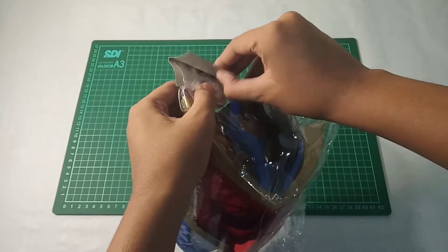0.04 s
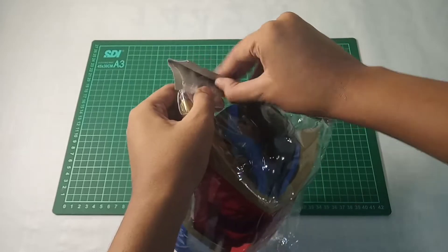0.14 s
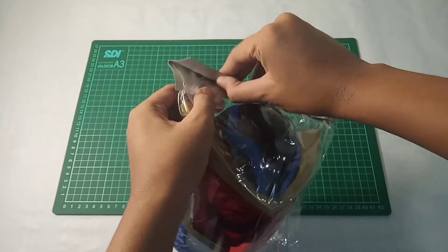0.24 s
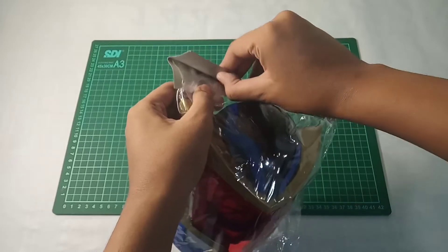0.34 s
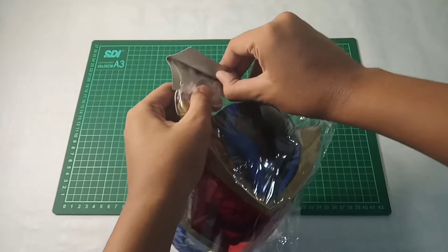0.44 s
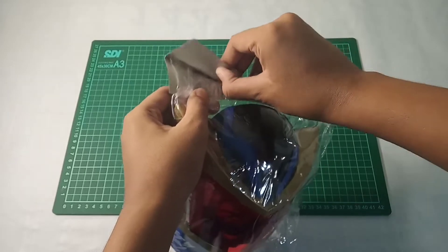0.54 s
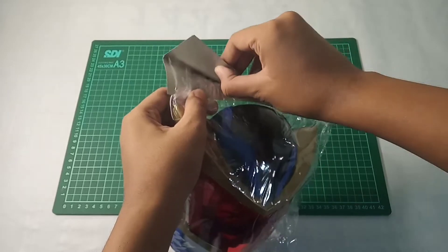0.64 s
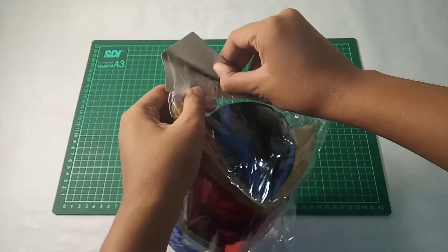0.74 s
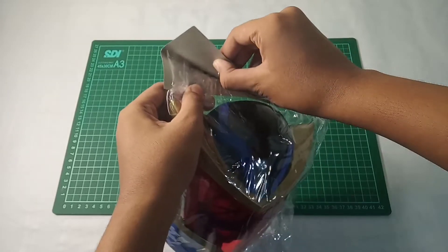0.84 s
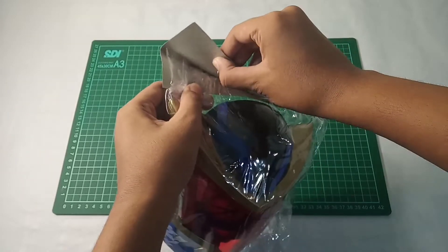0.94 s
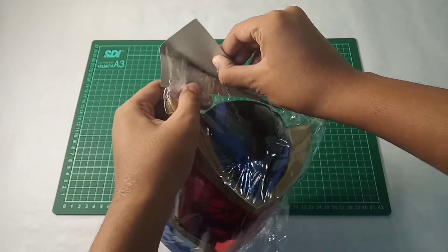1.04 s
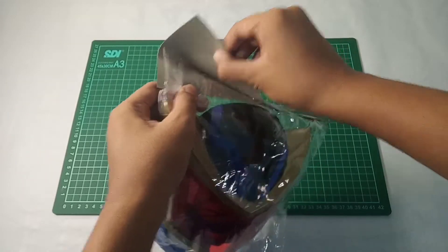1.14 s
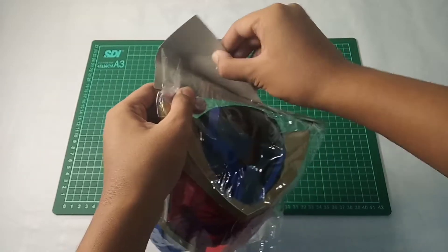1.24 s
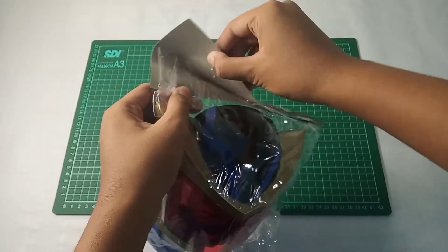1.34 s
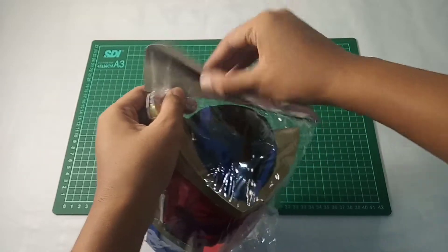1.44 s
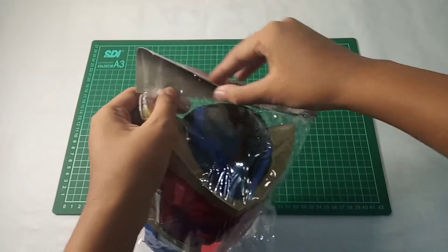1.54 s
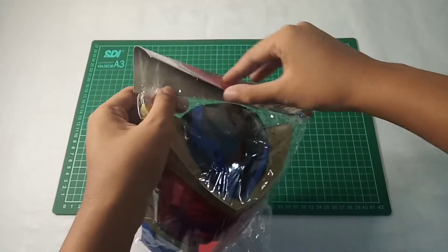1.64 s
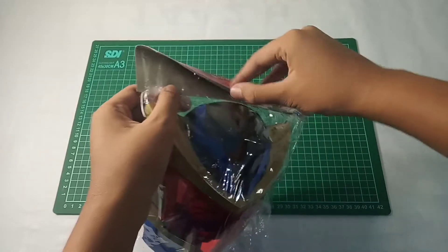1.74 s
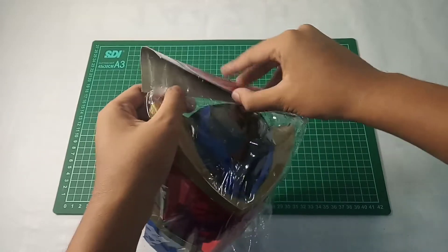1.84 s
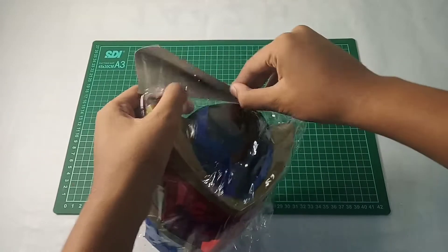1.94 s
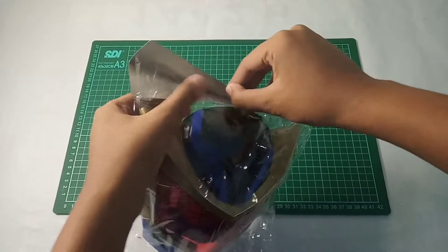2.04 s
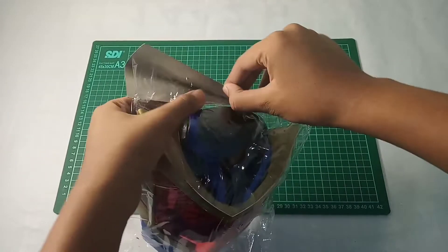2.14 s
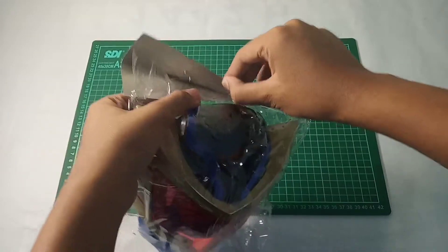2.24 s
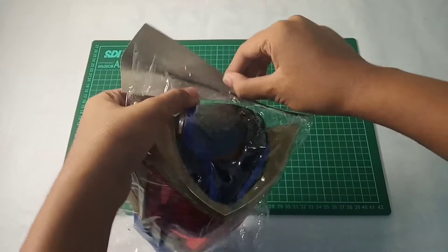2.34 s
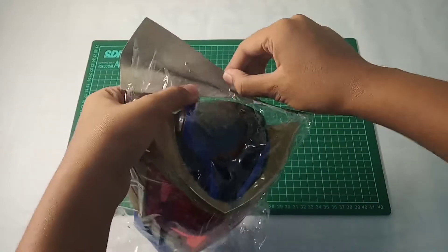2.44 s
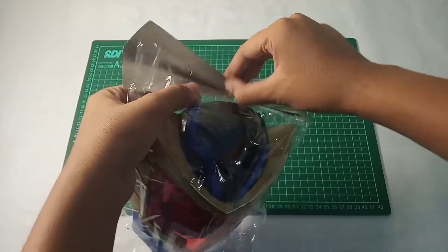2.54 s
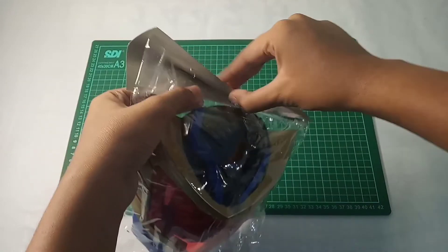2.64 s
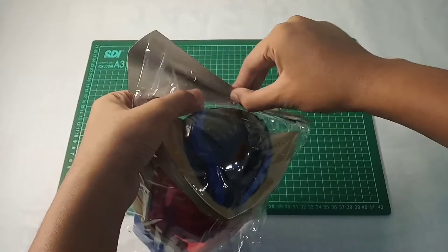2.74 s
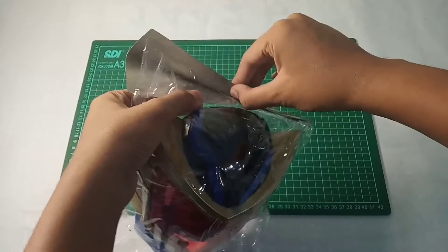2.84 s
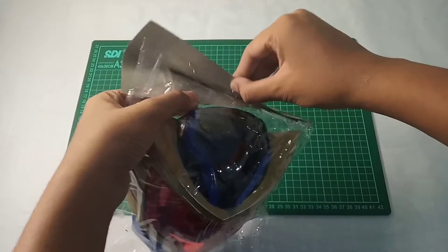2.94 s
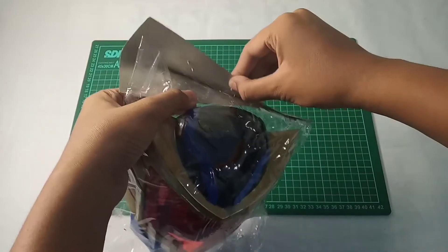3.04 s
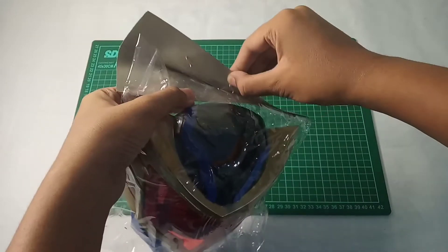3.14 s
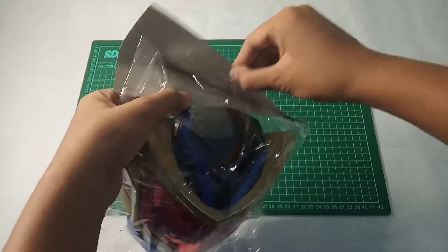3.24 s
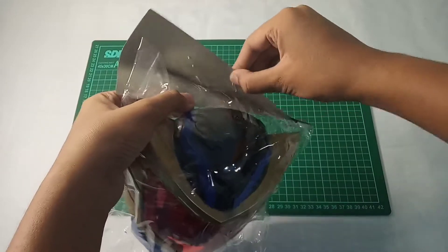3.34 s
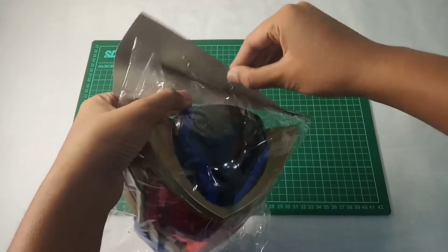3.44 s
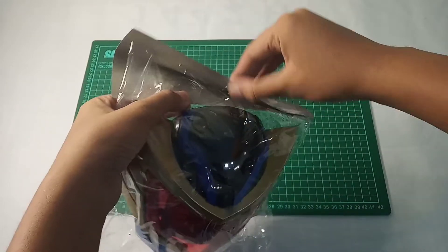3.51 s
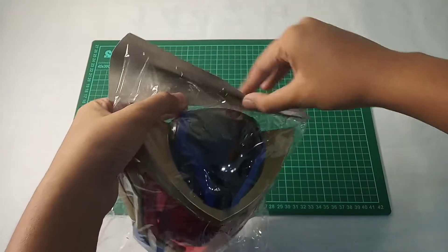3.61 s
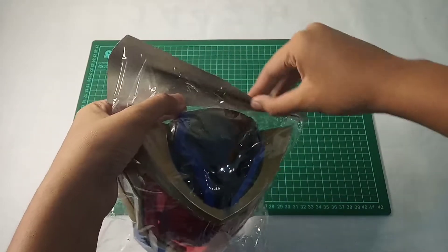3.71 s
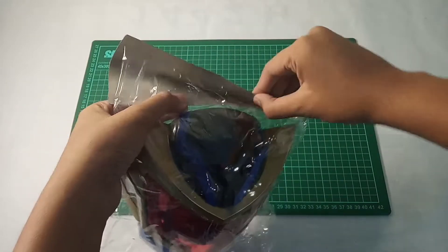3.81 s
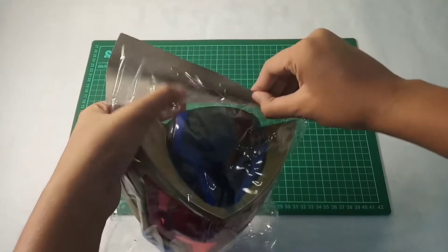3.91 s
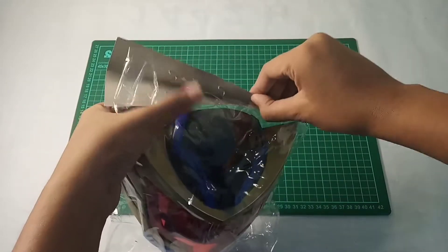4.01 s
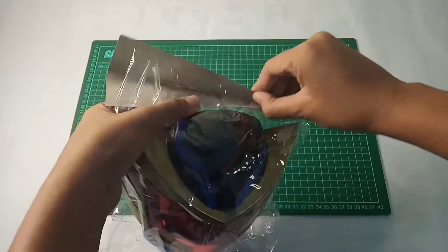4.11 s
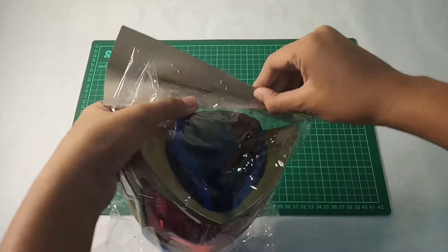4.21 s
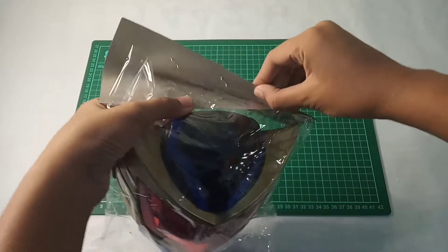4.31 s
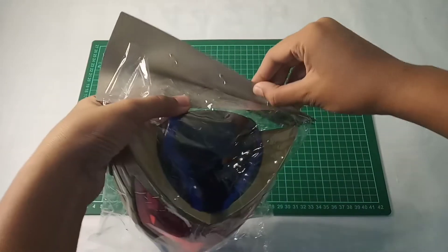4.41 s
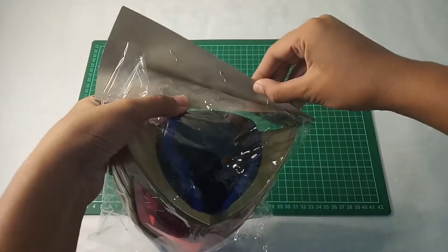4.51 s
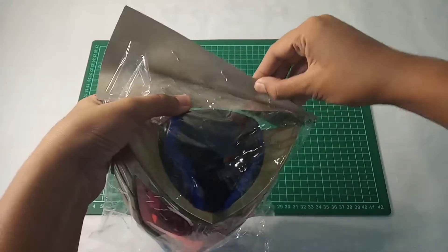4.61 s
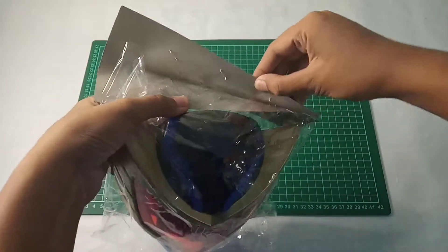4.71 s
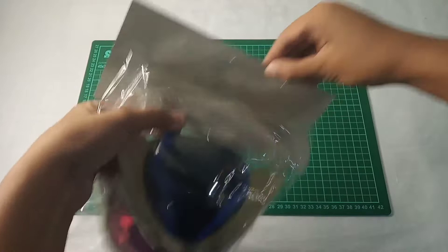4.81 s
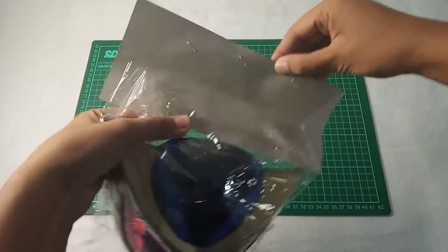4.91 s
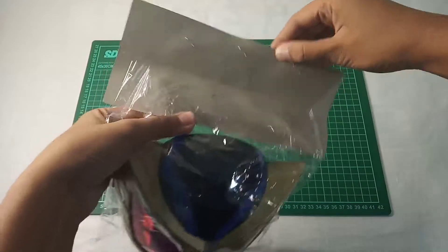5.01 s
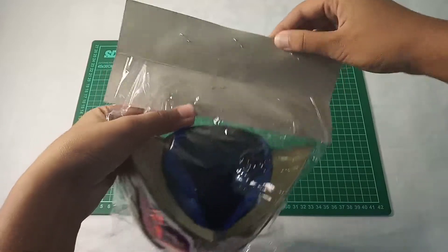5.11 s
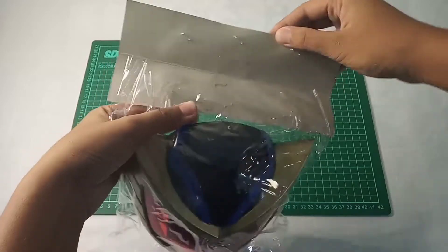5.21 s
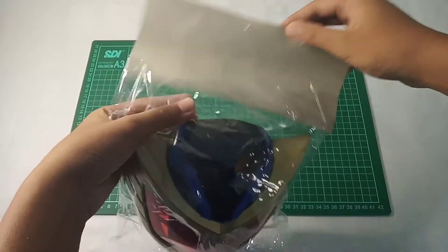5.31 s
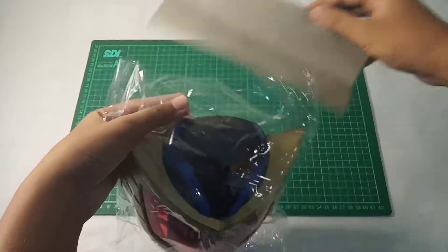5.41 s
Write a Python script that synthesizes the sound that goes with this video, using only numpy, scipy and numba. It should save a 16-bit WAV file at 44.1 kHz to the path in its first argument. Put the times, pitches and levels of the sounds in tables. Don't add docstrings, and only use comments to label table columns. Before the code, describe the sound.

A crinkly plastic bag is tugged open by hand, with bright cracks, small pops and dull panel thumps in a small room.

```python
import sys
import numpy as np
from scipy import signal
from scipy.io import wavfile
from scipy.ndimage import uniform_filter1d, map_coordinates
from numba import njit

SR = 44100
rng = np.random.default_rng(int(sys.argv[2]) if len(sys.argv) > 2 else 0)


def boost_factor(decibels):
    exponent = np.asarray(decibels, float) / 20
    return 10 ** exponent


def dump_mix(stems):
    frames = np.atleast_2d(stems).T
    limited = np.clip(frames, -1, 1)
    pcm = np.round(limited * 32767).astype(np.int16)
    wavfile.write(sys.argv[1], SR, pcm)


N = 240991

# (lowest f/Hz, highest f/Hz, ring/cycles, snap trim/dB, rustle rate/buckles per s)
FILM = [
    (2152, 6840, 1.93, -0.5, 4500),
    (831, 2420, 2.64, -1, 1500),
    (7800, 11800, 0.84, 8.5, 6100),
    (241.8, 517, 2.34, -1.5, 500),
]
# (t/s, thump level/dB, pitch f/Hz, slow push of air relative level/dB)
THUMPS = [(0.567, -29, 440, -41), (0.611, -14.5, 450, -56), (1.189, -8, 318, -21), (1.719, -43.5, 388, -25),
          (1.783, -40, 452, -28), (1.984, -39, 343, -36), (2.012, -27, 436, -46), (2.128, -30.5, 296, -45),
          (2.156, -24, 370, -36), (2.196, -33, 465, -21), (2.212, -25.5, 505, -58), (2.34, -38, 430, -50),
          (2.58, -48, 440, -35), (2.874, -40, 304, -89), (2.983, -21.5, 452, -40), (3.125, -32, 380, -34),
          (3.2805, 0, 455, -24), (3.365, -28, 357, -44), (3.596, -31, 374, -31), (3.78, -28, 617, -64),
          (3.889, -48.5, 300, -28), (4.006, -25, 446, -15), (4.19, -35, 450, -22), (4.306, -25.5, 465, -47),
          (4.495, -18, 502, -32), (4.547, -31, 447, -18), (4.827, -14.5, 342, -22), (4.884, -16, 303, -6),
          (5.078, -26, 320, -22), (5.36, -39.5, 500, -7.5)]


def creases():
    # (t/s, crack level/dB, fold and sizzle relative level/dB, spread/ms)
    cracks = [(0.5681, -26.5, -6, -12, 3.6), (0.601, -18.5, 0.5, -8, 1.78),
              (0.6166, -3, -10.5, -11.5, 1.22), (1.083, -23.5, -14, -12.5, 1.9),
              (1.1906, -2, -9.5, -8, 1.95), (1.2272, -18, -4.5, -9.5, 4.2), (1.784, -14, -11, -14, 2.51),
              (2.0351, -26, 1, -5, 4.1), (2.127, -17.5, -6, -19, 2.8), (2.2164, -29.5, 8, -27, 4.5),
              (2.2549, -27, -9, -6.5, 2.2), (2.7013, -23, 4, -7, 1.8), (2.8767, -19, -1.5, -37, 2.86),
              (3.1372, -13, -2, -11, 2.13), (3.2815, -6, 2.5, -9.5, 3.4), (3.5757, -26, -4.5, -3, 1.53),
              (3.971, -24, -6.5, -12, 1.5), (4.0383, -17.5, -5.5, -38, 0.92),
              (4.3083, -9, -16, -14.5, 1.05), (4.4966, -12.5, -7, -17.5, 2.1),
              (4.8285, -5.5, -10, -3, 2.04), (4.8824, -12, -1.5, -7.5, 4.94), (5.319, -33, -10.5, -10, 5),
              (5.3663, -32, -4.5, -20, 1.7)]
    # (t/s, crack level/dB, sizzle relative level/dB, spread/ms)
    ticks = [(0.1493, -40, -9, 1.7), (0.221, -25.5, -25, 2.13), (0.432, -53, 8, 3.3),
             (0.5127, -58, -7, 3.6), (0.525, -28, -9.5, 0.6), (1.1556, -29, -23, 1.5),
             (1.4595, -25, -20.5, 0.6), (1.511, -15.5, -18, 5.3), (1.5426, -20, -19, 1.12),
             (1.7185, -30.5, -24, 4.1), (1.961, -35, -6, 5.9), (1.9731, -25.5, -5, 2.8),
             (1.9842, -27.5, -0.5, 2.5), (2.158, -11, -8, 0.6), (2.236, -29.5, -6, 3.7),
             (2.7154, -24, -21, 1.1), (3.3114, -8, -2, 3.17), (3.674, -32, -13, 3.8),
             (3.7576, -35, -29, 1.7), (3.78, -23.5, -42, 1.1), (3.853, -32, -12, 2.5),
             (3.8881, -34.5, -5.5, 2.04), (3.9926, -20, -15, 2), (4.0297, -14, -20.5, 1.46),
             (4.0787, -24.5, -19, 3.5), (4.1091, -19.5, -28, 1.44), (4.3899, -23, -21, 1.52),
             (4.546, -13.5, -19, 1.1), (4.965, -25.5, -30, 3.3), (5.3329, -27.5, -17.5, 2.5)]
    # (t/s, crack level/dB, fold relative level/dB, pitch f/Hz)
    pops = [(0.0091, -36.5, -14, 1260), (0.1706, -32.5, -22, 1920), (1.56, -42.5, 5, 1040),
            (1.767, -35.5, -7, 1247), (2.0118, -22, -8, 1130), (2.053, -20.5, -11, 2160),
            (2.0942, -26, 3, 900), (2.2993, -30.5, 4.5, 1077), (2.3402, -33.5, 12.5, 980),
            (2.3621, -33.5, -3, 910), (2.3991, -30.5, 4.5, 1043), (1.5164, -18.5, -15.5, 2050),
            (2.6211, -16, -4.5, 1980), (2.6348, -24.5, 3.5, 950), (2.6767, -24, -10, 1150),
            (2.7215, -24.5, 7, 980), (2.772, -30.5, 6, 947), (2.7973, -43, 15, 1020),
            (2.8292, -22.5, -3, 960), (2.8593, -20, 1, 954), (2.9589, -21, -5, 890), (2.9831, -19, 2, 924),
            (3.0053, -27, -19, 1170), (3.5605, -31, -2, 1950), (3.5951, -18.5, -7.5, 1726),
            (4.0005, -25.5, 2.5, 1880), (4.193, -33, -0.5, 1396), (4.5505, -24, -8.5, 903),
            (4.7632, -28, 2.5, 886), (4.913, -12.5, -1.5, 898)]
    crack_hz, tick_hz = 1395, 2000
    tick_fold_db, pop_sizzle_db, pop_ms = -19.5, -13, 3.1
    rows = [(s, db, fold, sizzle, crack_hz, ms) for s, db, fold, sizzle, ms in cracks]
    rows += [(s, db, tick_fold_db, sizzle, tick_hz, ms) for s, db, sizzle, ms in ticks]
    rows += [(s, db, fold, pop_sizzle_db, hz, pop_ms) for s, db, fold, hz in pops]
    return rows


def specks():
    # (t/s, crack level/dB, fold and sizzle relative level/dB, fold pitch f/Hz)
    small = [(0.115, -40, -13, -12, 1310), (0.392, -58, -15, 6, 1500), (0.4044, -54, -15, 2, 1540),
             (0.422, -62, -15, 10, 1500), (0.4663, -54, -20, 6, 1640), (0.8044, -62, -10, 10, 1090),
             (1.478, -37, -20, -12, 2190), (1.5524, -40, -15, 0, 1310), (1.7675, -31, -25, -3, 1340),
             (1.7964, -34, -16, -14, 2140), (2.0044, -38, 4, -12, 1010), (2.1444, -33, -6, -18, 1420),
             (2.3174, -33, -2, -25, 1500), (2.614, -26, -12, -10, 1900), (3.5483, -33, -7, -12, 1320),
             (3.7124, -39, -13, -21, 1300), (3.7764, -28, -15, -25, 861), (3.8282, -34, -23, -23, 1330),
             (4.0054, -27, -6, -24, 2200), (4.0094, -27, -3, -23, 880), (4.0134, -25, 0, -27, 1200),
             (4.0174, -29, -3, -25, 845), (4.144, -35, -6, -27, 1320), (4.2094, -46, 9, -20, 1500),
             (4.2954, -48, 11, -20, 1320), (4.555, -25, -20, -5, 2000), (4.8594, -24, 2, -13, 1770),
             (4.9034, -22, -4, -15, 907), (5.2839, -47, -10, -8, 886), (5.3604, -40, -2, -10, 1340),
             (4.4985, -26, 6, -20, 2100)]
    spread_ms = 1.4
    return [(*row, spread_ms) for row in small]


def snaps(rows, count=20, size=2048):
    out = np.zeros(N)
    impulse = 1.0 * (np.arange(256) == 8)
    click = between(impulse, 1800, 12000)
    chance = rng.random((len(rows), 3, 6, count))
    golden_steps = np.arange(count) * (5 ** .5 - 1) / 2
    chance[:, :, 0] = (chance[:, :, 0, :1] + golden_steps) % 1
    for (s, crack_db, fold_db, sizzle_db, fold_hz, ms), parts in zip(rows, chance):
        add(out, s, click, crack_db - 6 - 3 * ms)
        for db, part, (lo_hz, hi_hz, cycles, trim_db, _) in zip([0, fold_db, sizzle_db], parts, FILM):
            delay_ms = -np.log(part[4] * part[5] ** .35) * ms * .55
            start = np.minimum(delay_ms, 25) * SR / 1000
            start[:2] = 8
            burst = buckles(size, start, part, lo_hz, hi_hz, cycles)
            add(out, s, burst, crack_db + db + trim_db)
        start = parts[1, 4, :3] * 0.001865 * SR
        ring = buckles(size, start, parts[2, 1:, 3:6], 0.951 * fold_hz, 1.054 * fold_hz, 3.9)
        add(out, s, ring, crack_db + fold_db - 1.5)
    return out


def buckles(size, start, chance, lo_hz, hi_hz, cycles):
    hz = lo_hz * (hi_hz / lo_hz) ** chance[0]
    scatter_db = 3 * np.minimum(-np.log(1 - chance[2]), 3.2)
    gain = boost_factor(scatter_db) * np.sign(chance[3] - .5)
    rings = grains(size, start.astype(np.int64), hz, cycles * (.5 + chance[1]), gain)
    return between(rings, 0.5 * lo_hz, 1.1 * hi_hz)


@njit
def grains(size, start, hz, cycles, gain):
    out = np.zeros(size)
    for k in range(len(start)):
        turn = np.exp((2j * np.pi - 1 / cycles[k]) * hz[k] / SR)
        z = gain[k] + 0j
        end = min(size, start[k] + int(6 * cycles[k] * SR / hz[k]))
        for i in range(start[k], end):
            z *= turn
            out[i] += z.imag
    return out


def between(x, lo_hz, hi_hz):
    edges = [lo_hz, min(hi_hz, .45 * SR)]
    return signal.sosfilt(signal.butter(2, edges, "band", fs=SR, output="sos"), x)


def add(out, s, burst, db):
    at = int(s * SR)
    out[at:at + len(burst)] += (burst * boost_factor(db) / np.abs(burst).max())[:N - at]


def rustle():
    # (t/s, rustle level/dB, extra level of the wide parts/dB)
    pull = [(0.0, -63.5, 6.5), (0.14, -43, -13.5), (0.36, -60, -6.5), (0.92, -59, -8), (1.3, -54.5, -20),
            (1.63, -52, -8), (1.9, -52, -12), (2.05, -51, -1.5), (2.3, -44, -1.5), (2.5, -48, -13.5),
            (2.7, -46.5, 0.5), (3.05, -47.5, 0), (3.4, -50.5, -20), (3.7, -46, -10), (4.4, -63, 1),
            (4.95, -53, -6.5), (5.24, -60, -3), (5.46, -55, -5)]
    # (t/s, extra sizzle level/dB)
    slide = [(0.0, 6), (0.3, -2), (0.42, 7.5), (0.8, 2.5), (1.6, 4), (1.85, 2), (1.97, 2.5), (2.26, -0.5),
             (2.42, -2.5), (3.05, 2.5), (3.45, 0), (3.87, 2.5), (4.1, 3.5), (4.6, 1), (5.22, -3),
             (5.4, 2.5)]
    # (t/s, length/s, level/dB, extra level of the wide parts/dB)
    rips = [(0.12, 0.015, -51, -1), (0.41, 0.04, -57.5, -12), (0.788, 0.043, -69.5, 6.5),
            (2.231, 0.064, -47.5, -3), (3.852, 0.051, -45, -25), (1.94, 0.18, -49, -12.5),
            (1.554, 0.022, -50, 0), (2.587, 0.089, -42.5, 0), (4.853, 0.0604, -26, 3.5),
            (5.094, 0.008, -49, 19.5), (5.317, 0.046, -54, 1), (2.56, 0.04, -52.5, -0.5),
            (2.4, 0.078, -57, -5), (4.135, 0.022, -54, 5.5), (1.075, 0.087, -54, -16.5),
            (4.4, 0.041, -55, -12), (1.0, 0.1, -58, -10), (4.0, 0.024, -46, 2), (1.46, 0.04, -54, -30),
            (3.59, 0.05, -56, -8), (2.6, 0.045, -46, -6), (4.68, 0.05, -62, -15)]
    # (t/s, fade/s, level/dB, extra level of the wide parts/dB)
    creeps = [(1.546, 0.14, -43, -24), (1.8, 0.06, -55, -20), (0.63, 0.08, -49, -22),
              (4.56, 0.09, -50, -28), (4.32, 0.08, -56, -25), (5.37, 0.12, -53, -3), (4.92, 0.06, -46, -8),
              (0.17, 0.09, -50, -15), (1.235, 0.07, -47, -15), (5.115, 0.05, -53, -2),
              (3.32, 0.04, -46, -20)]
    t = np.arange(N) / SR
    s, pull_db, wide_db = np.transpose(pull)
    pull_db, wide_db = np.interp(t, s, pull_db), np.interp(t, s, wide_db)
    steps = np.repeat(rng.standard_normal(N // 256 + 1), 256)
    flurry = boost_factor(2.38 * uniform_filter1d(steps, 128)[:N])
    swells = [np.clip(np.minimum(t - at, at + long - t) / 0.0082, 0, 1) for at, long, *_ in rips]
    for at, fade, *_ in creeps:
        rise = np.clip((t - at) / 0.006, 0, 1)
        swells.append(rise * np.exp(-np.abs(t - at) / fade))
    moves = list(rips) + list(creeps)
    out = np.zeros(N)
    for k, (lo_hz, hi_hz, cycles, _, rate) in enumerate(FILM):
        chance = rng.random((50000, 5)).T
        start = np.cumsum(-np.log(1 - chance[4])) * SR / rate
        rain = flurry * buckles(N, start, chance, lo_hz, hi_hz, cycles)
        surge = sum(follow(k, *move[2:]) * swell for move, swell in zip(moves, swells))
        gain = follow(k, pull_db, wide_db) + surge + settling(k)
        if k == 2:
            gain = gain * boost_factor(np.interp(t, *np.transpose(slide)))
        out += rain / rain.std() * gain
    return out


def follow(part, db, wide_db):
    # (offset/dB, share of the level swing, share of the extra dB)
    shares = [
        (-1.6, 1.014, 0.13),
        (1, 0.8, 1.19),
        (-11, 0.9, 0.24),
        (-1, 0.69, 0.92),
    ]
    usual_db = -50
    offset_db, swing, share = shares[part]
    return boost_factor(usual_db + offset_db + swing * (db - usual_db) + share * wide_db)


def settling(part):
    # (level under the blow/dB, fade/s)
    rest = [
        (-40, 0.095),
        (-34.5, 0.06),
        (-32, 0.047),
        (-25.5, 0.044),
    ]
    if part == 3:
        blows = [(s, db) for s, db, *_ in THUMPS]
    else:
        blows = [(s, db + [0, *rel][part]) for s, db, *rel in creases()]
    s, db = np.transpose(blows)
    under_db, fade_s = rest[part]
    kick = np.zeros(N)
    kick[(s * SR).astype(int)] = boost_factor(db + under_db)
    fading = signal.lfilter([1], [1, -np.exp(-1 / (fade_s * SR))], kick)
    return np.roll(uniform_filter1d(fading, size=256), shift=256)


def thumps(rows, count=5, size=4096):
    out = np.zeros(N)
    chance = rng.random((len(rows), 5, count))
    chance[:, 0] = (np.arange(count) + chance[:, 0]) / count
    for (s, db, hz, air_db), part in zip(rows, chance):
        swing = buckles(size, part[4] * 0.0016 * SR, part, 0.784 * hz, 1.3 * hz, 1.32)
        puff = buckles(size, part[4] * 0.014 * SR, part, 101, 219, 2.4)
        add(out, s, swing, db + 1.0)
        add(out, s, puff, db + air_db - 4.5)
    return out


def panel_knocks():
    # (t/s, level/dB, pitch f/Hz, push of air relative level/dB)
    knocks = [
        (0.617, -22, 330, -30),
        (3.782, -28, 600, -40),
        (4.012, -29, 650, -30),
        (4.308, -25, 530, -40),
        (4.497, -22, 560, -40),
        (4.548, -24, 480, -40),
    ]
    return thumps(knocks)


def room():
    # (f/Hz, time to fall 60 dB t/s, level/dB)
    tail = [(162, 0.27, -39.5), (290, 0.35, -30), (556, 0.41, -29.5), (1390, 0.5, -34), (2100, 0.69, -30.5),
            (5200, 0.98, -31.5), (8800, 0.93, -31)]
    # (f/Hz, level/dB, time to fall 60 dB t/s)
    boom = [(264.5, -42.5, 0.75), (296, -15, 0.41), (328.7, -11, 0.31), (408.3, -39.5, 0.2),
            (452, -9, 0.14), (532, 20, 0.025), (632.5, -6.5, 0.2)]
    # (t/ms, level/dB)
    echoes = [
        (1.4, -23.5),
        (3.1, -12),
        (9.8, -18.5),
        (13.2, -51),
    ]
    t = np.arange(SR // 2) / SR
    response = np.zeros(len(t))
    for hz, t60, db in tail:
        hiss = band(band(rng.standard_normal(len(t)), hz, 1.23 * hz), hz, 1.23 * hz)
        response += boost_factor(-4.5 + db - 60 * t / t60) * hiss * np.sqrt(SR / hz) / 20
    for hz, db, t60 in boom:
        response += boost_factor(-43 + db - 60 * t / t60) * np.sin(2 * np.pi * hz * t)
    response *= np.clip(t / 0.017, 0, 1)
    response[0] = 1
    for ms, db in echoes:
        response[int(ms * SR / 1000)] += boost_factor(db)
    return response


def band(x, hz, width):
    return signal.lfilter(*signal.iirpeak(hz, hz / width, fs=SR), x)


def hush():
    # (f/Hz, level per Hz/dB)
    colour = [(20, 12), (285, 9.5), (738, -42), (1150, -1), (2200, 0.5), (5530, 1), (10800, -47),
              (16000, -62)]
    level_db, patchy_db, patch_s, patch_hz = -54, 4.8, .13, 330
    hz, s, cells = signal.stft(rng.standard_normal(N), SR, nperseg=1024)
    grid = np.meshgrid(hz / patch_hz, s / patch_s, indexing="ij")
    patch = map_coordinates(rng.standard_normal((120, 120)), grid, order=1, mode="wrap")
    colour_hz, colour_db = np.transpose(colour)
    colour_db = np.interp(np.log(hz + 1), np.log(colour_hz), colour_db)
    cells = cells * boost_factor(colour_db[:, None] + patchy_db * patch)
    air = signal.istft(cells, SR, nperseg=1024)[1][:N]
    return air / air.std() * boost_factor(level_db)


def scraps():
    # (t/s, length/s, f/Hz, level/dB)
    bits = [(0.0, .24, 1020, -61), (-.02, .07, 110, -56), (.13, .12, 100, -57), (.79, .12, 850, -58),
            (.97, .1, 290, -60), (1.27, .155, 310, -49), (.66, .16, 280, -57), (5.16, .11, 860, -56),
            (5.2, .13, 2380, -52), (5.12, .16, 60, -66), (5.12, .2, 290, -53), (5.4, .08, 120, -61),
            (-0.1, 5.7, 275, -64), (-0.1, 5.7, 165, -69), (5.36, .12, 2300, -57), (.93, .12, 1850, -64),
            (4.72, .06, 1000, -54), (4.42, .08, 300, -58), (3.55, 1.25, 295, -59), (.05, .3, 270, -62),
            (5.1, .22, 620, -62), (.78, .2, 100, -64), (4.71, .1, 300, -53), (.96, .09, 11000, -66),
            (5.18, .15, 300, -51)]
    t = np.arange(N) / SR
    out = np.zeros(N)
    for s, long, hz, db in bits:
        width = 30 + hz / 15
        air = band(band(rng.standard_normal(N), hz, width), hz, width)
        swell = np.clip(np.minimum(t - s, s + long - t) / .02, 0, 1)
        out += boost_factor(db) * air / air.std() * swell
    return out


def scene():
    bag = snaps(creases()) + snaps(specks()) + rustle() + thumps(THUMPS) + panel_knocks()
    air = hush() + scraps()
    return (signal.fftconvolve(bag, room())[:N] + air)[None]


def duck(x):
    grip_db, memory_s, strength = -20, 0.018, 0.5
    keep = np.exp(-1 / (memory_s * SR))
    power = signal.lfilter([1 - keep], [1, -keep], x ** 2)
    return x * (1 + power / boost_factor(2 * grip_db)) ** (-strength / 2)


def gate(x):
    over_floor_db, deepest_cut_db = 2.5, -9.0
    cells = signal.stft(x, SR, nperseg=1024)[2]
    power = uniform_filter1d(np.abs(cells) ** 2, size=7, axis=0)
    power = uniform_filter1d(power, size=3, axis=1) + 1e-18
    floor = np.percentile(power, 15, axis=1, keepdims=True) * boost_factor(2 * over_floor_db)
    gain = np.sqrt(np.clip(1 - floor / power, boost_factor(2 * deepest_cut_db), 1))
    return signal.istft(cells * gain, SR, nperseg=1024)[1][:N]


def band_limit(x):
    return signal.sosfilt(signal.butter(12, 16640, fs=SR, output="sos"), x)


def record(dry):
    # (f/Hz, width/Hz, level/dB)
    port = [
        (5995, 1230, 2),
        (4220, 1330, -4),
    ]
    x = dry[0] + sum(boost_factor(db) * band(dry[0], hz, width) for hz, width, db in port)
    x = signal.sosfilt(signal.butter(2, 57, "high", fs=SR, output="sos"), x)
    x = gate(duck(x))
    x = signal.sosfilt(signal.ellip(6, .3, 28, 15600, fs=SR, output="sos"), x)[None]
    bent = x - 0.035 * x ** 2
    mix = -0.0003 + 0.9 * np.tanh(bent / 1.27)
    return band_limit(mix)


dry = scene()
out = record(dry)
dump_mix(out)
```